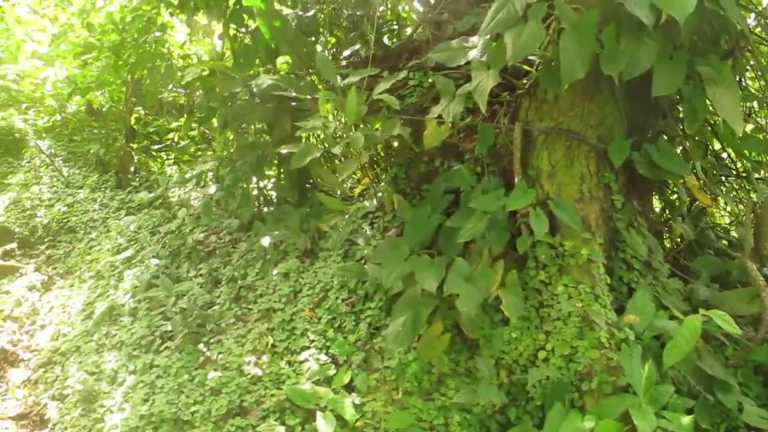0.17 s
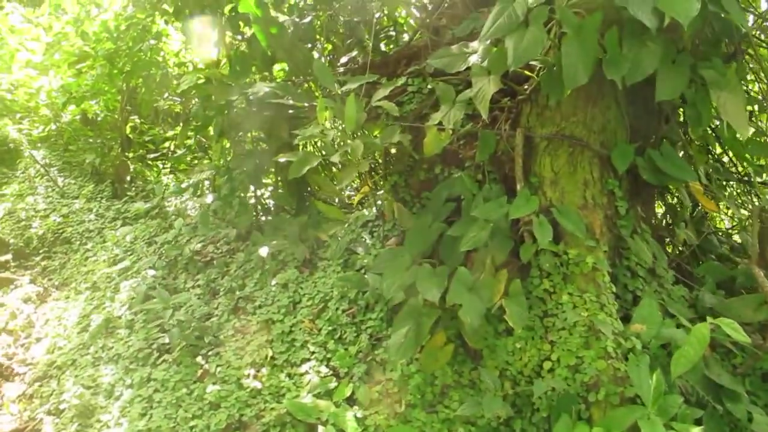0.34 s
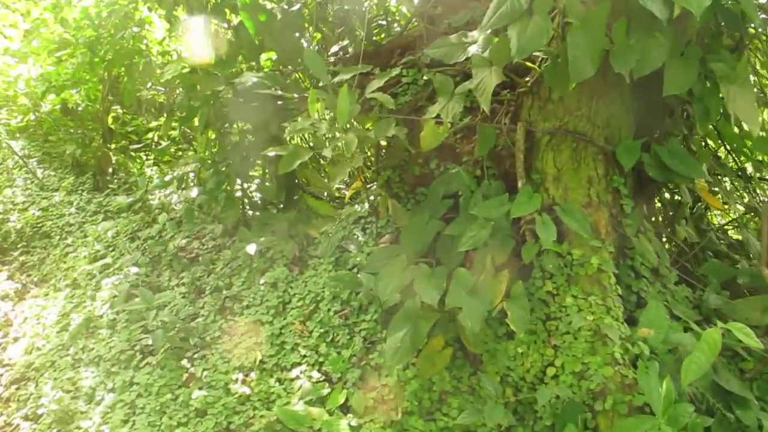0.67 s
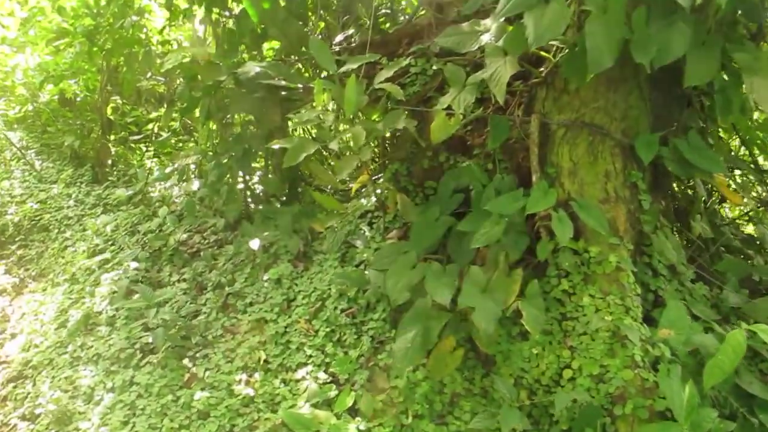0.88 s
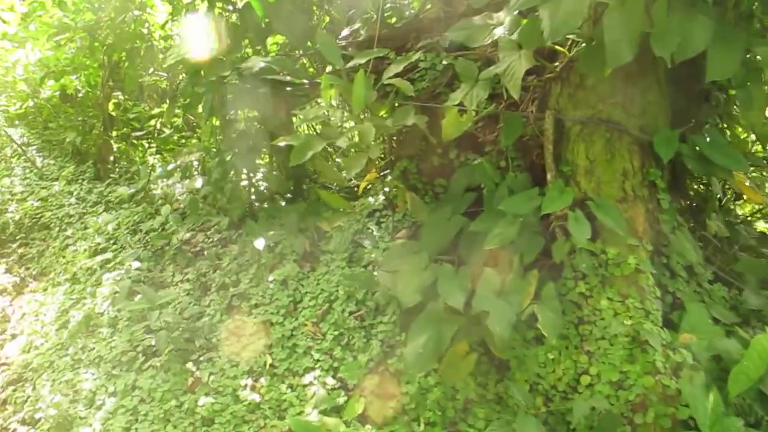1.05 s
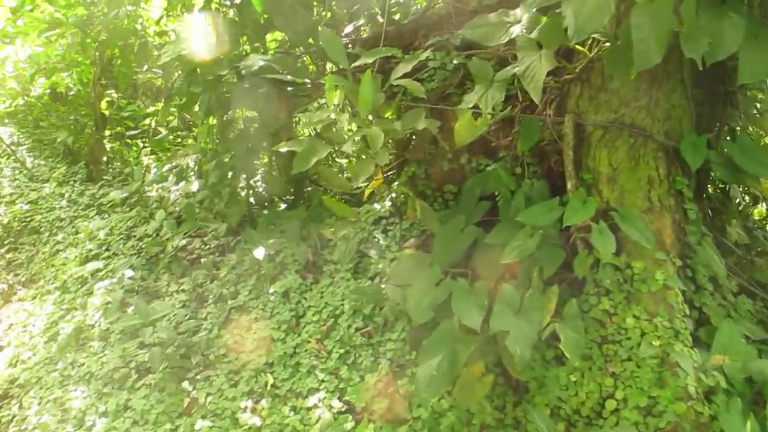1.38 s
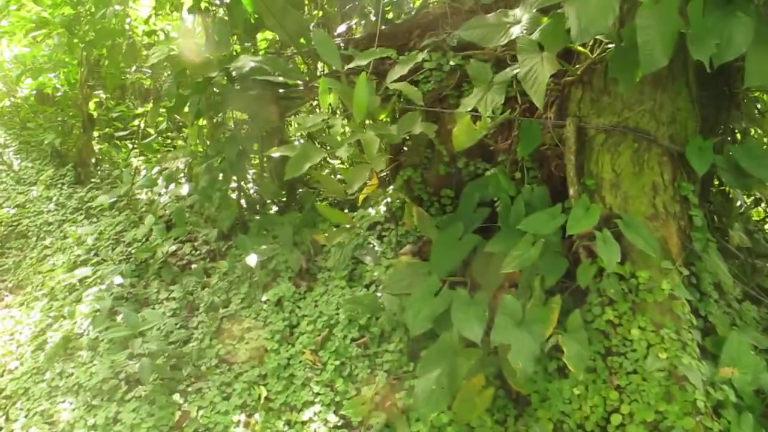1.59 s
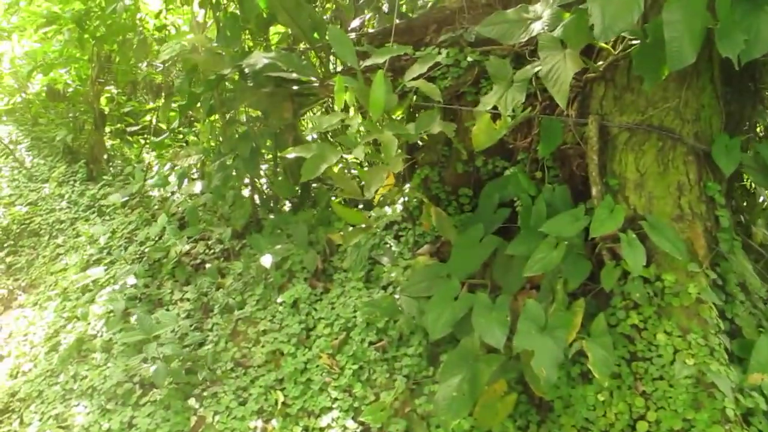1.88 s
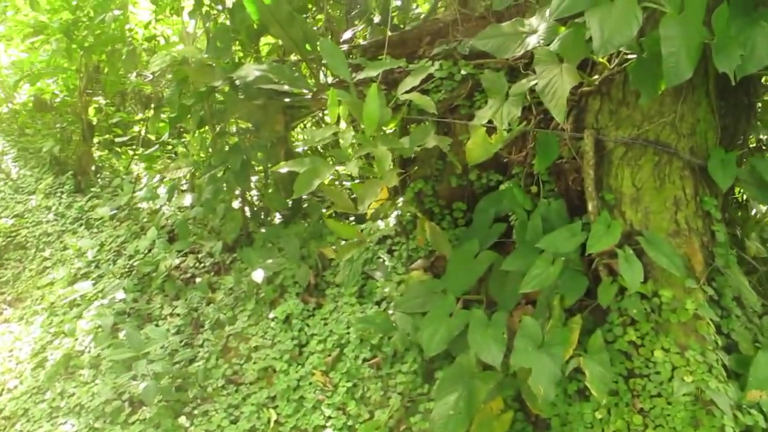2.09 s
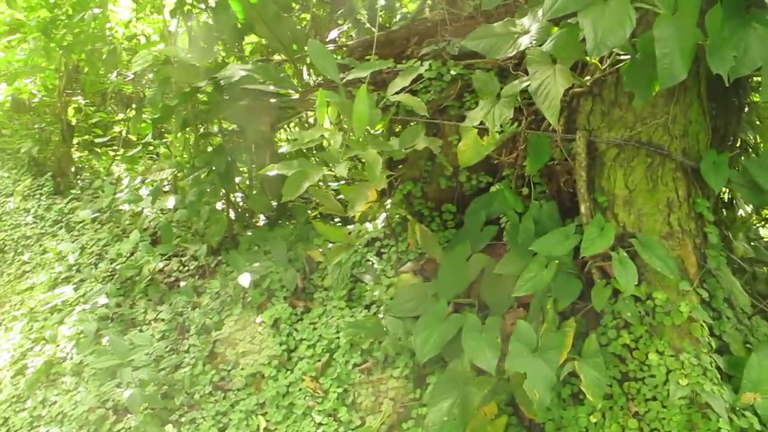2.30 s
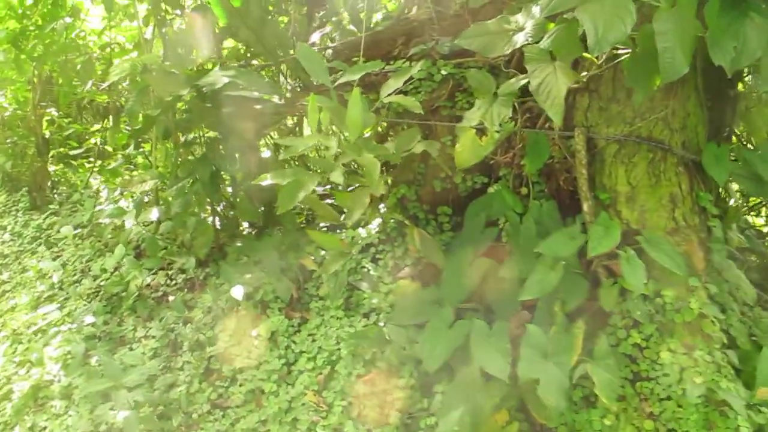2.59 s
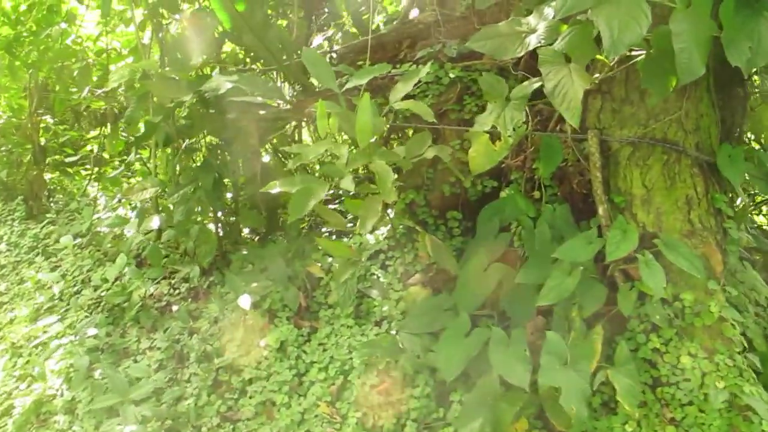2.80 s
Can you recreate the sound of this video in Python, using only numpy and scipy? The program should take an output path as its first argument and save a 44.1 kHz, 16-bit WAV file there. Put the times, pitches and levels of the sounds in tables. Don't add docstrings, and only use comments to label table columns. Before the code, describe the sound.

Fast, even series of bright, clicky frog chirps in dense foliage, recorded close on a small handheld stereo camera. Twigs crackle around one second, dull handling knocks come near two, over quiet airy rumble, insects and hiss.

```python
import sys
import numpy as np
from scipy import signal
from scipy.fft import rfft, irfft, next_fast_len
from scipy.io import wavfile
from scipy.ndimage import uniform_filter1d

SR = 44100
rng = np.random.default_rng(int(sys.argv[2]) if len(sys.argv) > 2 else 0)


def level_to_linear(level):
    exponent = np.asarray(level, float) / 20
    return 10 ** exponent


def unload_audio(sound):
    columns = np.transpose(np.atleast_2d(sound))
    steps = np.round(np.clip(columns, -1, 1) * 32767)
    wavfile.write(sys.argv[1], SR, steps.astype(np.int16))


N = 129654


def evened(x):
    return x / np.sqrt(np.mean(x ** 2) + 1e-20)


def read(points, hz):
    f, value = np.transpose(points)
    return np.interp(np.log(hz + 1), np.log(f + 1), value)


def add(mix, s, sound):
    part = mix[..., max(round(s * SR), 0):][..., :sound.shape[-1]]
    part += sound[..., :part.shape[-1]]


def resonate(x, hz, width):
    turn = np.exp(2j * np.pi * np.cumsum(hz * np.ones(x.shape[-1])) / SR)
    r = np.exp(-np.pi * width / SR)
    return 2 * (turn * signal.lfilter([1 - r], [1, -r], x / turn + 1e-18)).real


def causal(gain, size=512):
    log = np.log(np.maximum(np.r_[gain, gain[-2:0:-1]], 1e-5))
    return np.fft.ifft(np.exp(np.conj(signal.hilbert(log)))).real[:size]


def scatter(t60, start_s, size):
    taps = rng.standard_normal((2, size)) * (rng.random((2, size)) < .3)
    taps = taps * (np.arange(size) > start_s * SR)
    hz, t, z = signal.stft(taps, SR, nperseg=128)
    tail = signal.istft(z * level_to_linear(-60 * t / read(t60, hz)[:, None]), SR, nperseg=128)[1]
    return tail / np.linalg.norm(tail, axis=1, keepdims=True)


def air():
    # (frequency [Hz], level [dB per Hz])
    air_tone = [(30, -5), (75, 0.1), (160, -8), (500, -13.5), (1500, -26.5), (3500, -23), (7000, -24.5),
                (11000, -33.5)]
    # (frequency [Hz], correlation [0-1])
    likeness = [(60, 0.97), (300, 0.94), (700, 0.67), (1500, 1), (5000, 0.12)]
    frames, hz = N // 256 + 5, np.fft.rfftfreq(1024, 1 / SR)
    a, b, c, d, patches = rng.standard_normal((frames, 513, 5)).T
    patches = evened(uniform_filter1d(uniform_filter1d(patches, 10, 0), 12, 1))
    same = np.clip(read(likeness, hz), -1, 1)[:, None]
    left = a + 1j * b
    right = same * left + np.sqrt(1 - same ** 2) * (c + 1j * d)
    z = np.array([left, right]) * level_to_linear(read(air_tone, hz)[:, None] + 1.7 * patches)
    return level_to_linear(-44.5) * evened(signal.istft(z, nperseg=1024, noverlap=768)[1][:, :N])


def wander(s):
    size = round(s * SR)
    return evened(uniform_filter1d(uniform_filter1d(rng.standard_normal(N), size), size))


def wavering(hz, width_hz, pace_s):
    swell = level_to_linear(2.6 * wander(pace_s) + 1.5)
    return swell * np.sqrt(2) * np.sin(2 * np.pi * np.cumsum(hz + width_hz * wander(pace_s)) / SR)


def distance():
    # (frequency [Hz], width [Hz], level [dB])
    hums = [(72.2, 8.02, -54), (211, 2.6, -56)]
    # (time [s], frequency [Hz], level [dB])
    engine = [(0, 111.2, -40.5), (.3, 115.6, -51.5), (1.14, 117.9, -46), (1.3, 131.2, -53.5),
              (2.94, 130, -54.5)]
    # (time [s], frequency [Hz], level [dB])
    whistles = [
        [(.055, 2470, -62), (.1, 2458, -59), (.125, 2480, -63), (.27, 2544, -64.5)],
        [(2.7, 2080, -55), (2.735, 2060, -59)],
        [(2.745, 2110, -57), (2.785, 2150, -62)],
        [(2.8, 2230, -67), (2.845, 2260, -60), (2.865, 2180, -69.5)],
        [(2.875, 2160, -58.5), (2.94, 2390, -65)],
    ]
    t, out = np.arange(N) / SR, np.zeros(N)
    for hz, width_hz, db in hums:
        out += level_to_linear(db) * wavering(hz, width_hz, 0.075)
    for rows, width_hz, pace_s in [(engine, 3, .08)] + [(call, 14, .012) for call in whistles]:
        s, hz, db = np.transpose(rows)
        level = level_to_linear(uniform_filter1d(np.interp(t, s, db, -110, -110), 600))
        out += level * wavering(np.interp(t, s, hz), width_hz, pace_s)
    return out


def insects():
    # (frequency [Hz], width [Hz], left level [dB], right level [dB])
    choruses = [(2306, 130, -66.5, -65.5), (4820, 1600, -42.5, -53), (7130, 750, -74, -52.5)]
    out = np.zeros((2, N))
    for hz, width_hz, left_db, right_db in choruses:
        throb = evened(uniform_filter1d(uniform_filter1d(rng.standard_normal(N), 2500), 2500))
        band = resonate(resonate(rng.standard_normal((2, N)), hz, width_hz), hz, width_hz)
        out += level_to_linear(np.array([[left_db], [right_db]]) + 2 * throb) * evened(band)
    return out


def knocks():
    # (time [s], peak level [dB], frequency [Hz], decay t60 [s])
    bumps = [
        (.69, -32.5, 484, 0.029),
        (.952, -38.5, 500, 0.032),
        (1.001, -33, 76, 0.09),
        (2.052, -19, 178, 0.017),
        (2.106, -18.5, 344, 0.018),
        (2.393, -29, 340, 0.034),
        (2.561, -34, 72.3, 0.2),
        (2.707, -32, 499, 0.053),
        (2.85, -38, 386, 0.051),
    ]
    out, t = np.zeros((2, N)), np.arange(6000) / SR
    for s, db, hz, t60 in bumps:
        env = np.minimum(t * hz / 0.74, 1) * level_to_linear(db - 60 * t / (t60 * 1.47))
        ring = np.sin(2 * np.pi * hz * t) + 0.12 * np.sin(2 * np.pi * 1.3 * hz * t)
        add(out, s, env * ring * np.ones((2, 1)))
    return out


def snaps():
    # (time [s], peak level [dB], frequency [Hz], length [s], left minus right [dB])
    twigs = [(0.687, -43.5, 1300, 0.019, -4), (.8167, -41, 8800, 0.0046, -8),
             (0.922, -41, 2620, 0.0093, -8), (0.95, -35, 2480, .004, -6), (1.0005, -41, 5200, 0.0026, -1),
             (1.0022, -42, 2540, 0.0043, 4), (1.0045, -33.5, 6000, 0.0017, -16),
             (1.032, -40, 2700, 0.0029, 5), (1.0435, -32.5, 2500, 0.0025, 1),
             (1.04, -41, 1060, 0.0039, -13), (1.044, -41, 6900, 0.0026, -11), (1.063, -34, 1620, 0.008, 7),
             (1.072, -35.5, 930, 0.021, -4), (1.076, -26.5, 2250, 0.0036, -5),
             (1.1014, -35.5, 920, 0.0092, -12), (1.098, -35, 2010, 0.0042, -2),
             (1.1176, -38.5, 7100, 0.0025, -19), (1.1185, -32.5, 2100, 0.0033, -20),
             (1.1212, -27, 2430, 0.011, 5), (1.1222, -28.5, 5840, 0.0047, -21),
             (1.129, -41, 2800, 0.0052, 0), (2.0551, -35.5, 1290, 0.0032, 0),
             (2.055, -34.5, 2800, 0.0069, -2), (2.063, -39.5, 950, .005, 1), (2.106, -36, 1640, 0.0037, -6),
             (2.306, -41, 1010, 0.042, -2), (2.302, -42, 2030, .012, -5), (2.359, -39, 960, 0.0051, -1),
             (2.384, -44.5, 1470, 0.059, -3), (2.563, -36, 2300, .004, -4), (2.703, -48, 1700, 0.023, -2)]
    out, t = np.zeros((2, N)), np.arange(2000) / SR
    luck = rng.standard_normal((len(twigs), 3, 2000))
    for (s, db, hz, length, left_db), (shared, left, right) in zip(twigs, luck):
        u = t / length
        grit = np.array([shared + left, shared + right]) * np.minimum(u * 12, 1) * np.exp(-3.0 * u)
        grit[:, 0] = 2
        grit = resonate(resonate(grit, hz, 0.5 * hz), hz, hz)
        add(out, s, level_to_linear(db + np.array([[left_db], [-left_db]]) / 2) * grit / abs(grit).max() * 2.03)
    return out


def crackle():
    ticks = level_to_linear(1.8 * np.minimum(rng.exponential(1, (2, N)), 3)) * (rng.random((2, N)) < 150 / SR)
    return level_to_linear(-62) * evened(resonate(resonate(ticks, 1200, 920), 1200, 920))


def brushes():
    # (time [s], length [s], level [dB], frequency [Hz])
    drags = [
        (0.172, 0.17, -41, 6100),
        (0.279, 0.24, -48, 6960),
        (.68, 0.1, -52, 1520),
        (0.807, 0.031, -47, 8900),
        (0.851, 0.32, -45, 6940),
        (.9, 0.27, -44, 2500),
        (1.783, 0.089, -41.5, 6300),
        (2.05, .025, -37, 5450),
        (2.541, 0.12, -42.5, 7340),
    ]
    out = np.zeros((2, N))
    for s, length, db, hz in drags:
        size = round(length * SR)
        luck = rng.random((3, 16000))[:, :size]
        sizes = level_to_linear(-4.0 * np.log(luck[:2] + 0.018)) * np.sign(luck[:2] % .01 - .005)
        ticks = sizes * (luck[2] < 4000 / SR)
        grit = evened(resonate(resonate(ticks, hz, .5 * hz), hz, .5 * hz))
        swell = np.sin(np.pi * np.arange(size) / size)
        add(out, s, level_to_linear(db + np.array([[-7], [0]])) * swell * grit)
    return out


def foliage(x):
    # (frequency [Hz], t60 [s])
    forest_t60 = [(3000, 0.43), (5000, 0.12), (7000, 0.49), (10000, 0.19)]
    t, u, wet = np.arange(N) / SR, np.arange(300) / SR, np.zeros((2, N))
    for k in range(3):
        near = rng.standard_normal((3, 300)) * level_to_linear(-60 * u / 0.008) * (u > 0.0018)
        near = near[:2] + 0.48 * 2 * near[2]
        far = scatter(forest_t60, 0.0058, size=22050)
        paths = level_to_linear(-14.5) * (far + 2 * resonate(far, 5090, 420))
        paths[:, :300] += level_to_linear(-9) * near / np.linalg.norm(near, axis=1, keepdims=True)
        sway = np.sqrt(2 / 3) * np.cos(np.pi * (1.74 * t + k / 3))
        wet += signal.fftconvolve(x * sway, paths, axes=1)[:, :N]
    return x + wet


def vocal_sac():
    # (frequency [Hz], width [Hz], level [dB])
    sac_modes = [(3726, 295, -14), (4090, 580, -10.5), (4892, 397, 3.74), (5720, 490, -11.5),
                 (6550, 1030, -16.5)]
    # (frequency [Hz], width [Hz], level [dB])
    edge_modes = [(7510, 1180, -17), (8820, 990, -29.5)]
    hz = np.fft.rfftfreq(4096, 1 / SR)
    band = 1 / (1 + (2985 / (hz + 1)) ** 20) / (1 + (hz / 12200) ** 20)
    parts = []
    for modes, top_hz in ((sac_modes, 7600), (edge_modes[:1], SR), (edge_modes[1:], SR)):
        power = sum((level_to_linear(db) / (1 + ((hz - f) / w) ** 2)) ** 2 for f, w, db in modes)
        parts.append(causal(band / (1 + (hz / top_hz) ** 8) * np.sqrt(power)))
    return signal.resample_poly(np.array(parts) / abs(parts[0]).max(), 8, 1, axis=1)


def camera_shade(x):
    # (frequency [Hz], left minus right [dB])
    shade = [(2500, -2), (3600, -4), (4200, -3), (4700, -1), (5200, .8), (5900, 0), (6500, -5), (7300, -13)]
    size = next_fast_len(2 * N)
    hz = np.fft.rfftfreq(size, 1 / SR)
    late = rfft(x, size) * level_to_linear(read(shade, hz)) * np.exp(-2j * np.pi * hz * .000028)
    return np.array([irfft(late)[:N], x])


def frog():
    # (time [s], length [s], clicks [count], level [dB], share where clicks are slowest [0-1])
    chirps = [(0.0155, 0.0373, 11, -12.4, 0.47), (0.1339, 0.0387, 12, -11.9, 0.44),
              (0.2505, 0.0386, 13, -11.8, 0.32), (0.3628, 0.04, 13, -11.5, 0.35),
              (0.479, 0.0409, 13, -11.4, 0.33), (0.5887, 0.0447, 14, -10.4, 0.39),
              (0.7081, 0.0397, 12, -11.4, 0.46), (0.8231, 0.0431, 14, -10.4, 0.4),
              (0.9397, 0.0432, 14, -10.3, 0.32), (1.0598, 0.0378, 12, -10.9, 0.42),
              (1.1729, 0.0412, 13, -10.1, 0.42), (1.2904, 0.0412, 13, -10.0, 0.4),
              (1.4102, 0.0391, 13, -9.5, 0.31), (1.5261, 0.0422, 14, -9.4, 0.31),
              (1.6429, 0.0405, 13, -9.7, 0.35), (1.7585, 0.0377, 12, -9.6, 0.43),
              (1.875, 0.0396, 12, -10.4, 0.55), (1.9925, 0.0397, 13, -10.1, 0.35),
              (2.1094, 0.0391, 13, -9.1, 0.33), (2.2233, 0.0411, 13, -9.2, 0.48),
              (2.3441, 0.0395, 12, -9.5, 0.43), (2.4587, 0.0444, 14, -9.3, 0.44),
              (2.581, 0.0391, 12, -9.7, 0.42), (2.6979, 0.0415, 13, -9.6, 0.35),
              (2.8152, 0.0409, 13, -10.0, 0.43), (2.9327, 0.044, 13, -10.0, 0.45)]
    leads = [4, 4.6, 4.5, 4.1, 5.1, 3.2, 3.1, 3.6, 3.9, 3.7, 4.4, 4.6, 3.9, 3, 4.1, 4.4, 3.7, 4.4, 4.3, 3.5,
             3.9, 3, 4.6, 4.6, 4.2, 3.9]
    pace = [(0.0, 1.01), (0.15, 0.97), (0.35, 0.99), (0.42, 1.04), (0.5, 1.23), (0.65, 1.16), (0.8, 0.98),
            (0.9, 0.81), (1.0, 0.52)]
    # (share of chirp [0-1], effort [dB])
    effort = [(0, -9.5), (.2, -3), (.4, -1.3), (.6, 0.13), (.8, -1.35), (.9, 0.3), (.96, -7), (1, -4)]
    # (time [s], level [dB])
    fullness = [(0, -17), (2.3, -5.5), (2.7, 11)]
    ring, edge, tip = vocal_sac()
    u = np.arange(len(ring)) / 8 / SR
    after = (1 - np.exp(-(u / 0.0024) ** 2)) * np.exp(-np.pi * 221 * u) * np.sin(2 * np.pi * 4896 * u)
    out, n = np.zeros(N), np.arange(-8, 440)
    luck = rng.standard_normal((len(chirps), 4, 20))
    for (start, length, clicks, level_db, turn), lead_ms, (a, b, c, d) in zip(chirps, leads, luck):
        k = round(clicks)
        progress = np.interp((np.arange(k - 1) + .5) / (k - 1), [0, turn, 1], [0, .5, 1])
        gaps = np.interp(progress, *np.transpose(pace)) * (1 + .03 * a[:k - 1])
        share = np.r_[-lead_ms / 1000 / length, 0, np.cumsum(gaps) / gaps.sum(), 1 + 0.0021 / length]
        effort_db = np.interp(share, *np.transpose(effort), left=effort[0][1] - 3.6)
        effort_db = np.r_[effort_db[:-1], -11 + 3 * a[-1]] + .7 * b[:k + 2]
        pitch = 1 + 0.0049 * (share - .5) + .016 * c[:k + 2]
        bright_db = 1.3 * effort_db - 7 * np.clip(share, 0, 1) ** 4 + 2 * d[:k + 2]
        full_db = np.interp(start, *np.transpose(fullness))
        moments = (start + 0.000382 + share * length) * SR
        for s, db, p, b_db in zip(moments, effort_db, pitch, bright_db):
            click = ring * level_to_linear(.6 * min(db, 0) * u * 1000)
            click = click + level_to_linear(b_db) * (edge + level_to_linear(b_db) * tip)
            click = click + level_to_linear(full_db + 0.5 * db) * after
            tuned = np.interp((n - s % 1) * p * 8, np.arange(len(click)), click, 0, 0)
            add(out, (int(s) - 8) / SR, level_to_linear(level_db + db) * tuned)
    return camera_shade(level_to_linear(2.5) * out)


def scene():
    near = foliage(frog()) + knocks() + snaps() + crackle() + brushes()
    return near + level_to_linear([[-2], [0]]) * (air() + distance()) + insects()


def band_limit(x):
    return signal.sosfilt(signal.butter(12, 15700, fs=SR, output="sos"), x)


def record(dry):
    dull = signal.sosfiltfilt(signal.butter(6, 10910, fs=SR, output="sos"), dry)
    hiss = level_to_linear(-61.5) * evened(signal.lfilter([1], [1, -.6], rng.standard_normal(dry.shape)))
    wide = signal.sosfilt(signal.butter(2, 22, "high", fs=SR, output="sos"), dull + hiss)
    mix = wide * np.minimum(np.arange(N)[::-1] / 50, 1)
    return band_limit(mix)


dry = scene()
out = record(dry)
unload_audio(out)
```